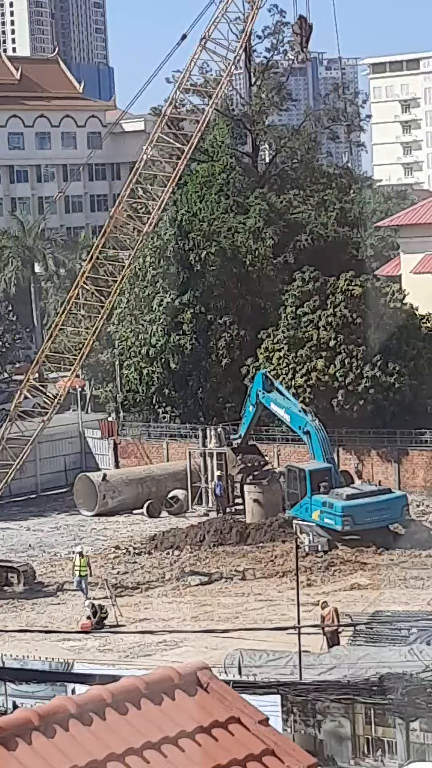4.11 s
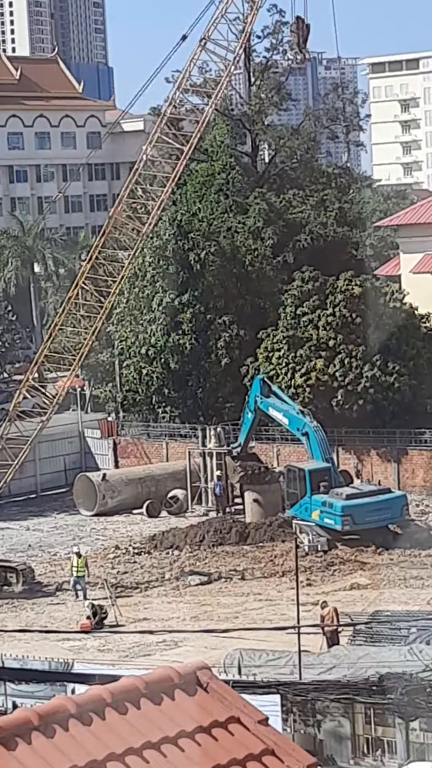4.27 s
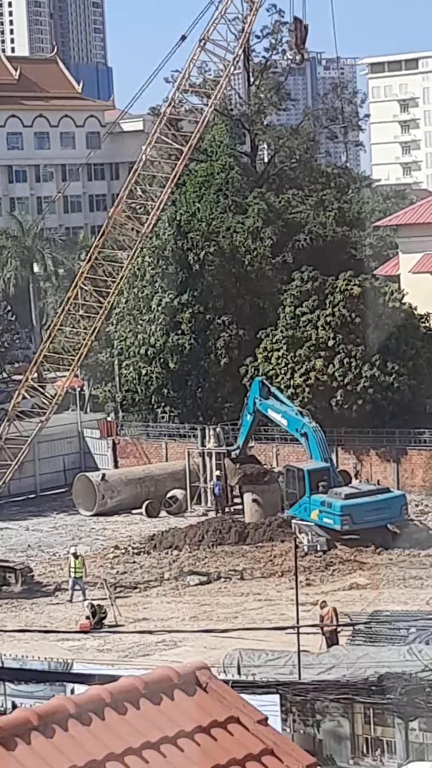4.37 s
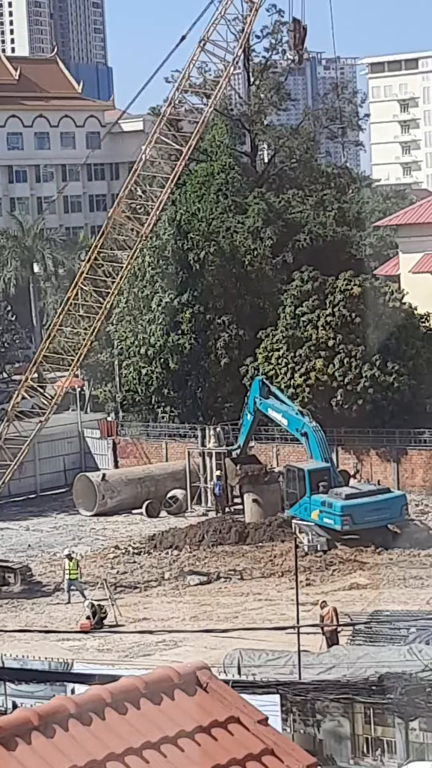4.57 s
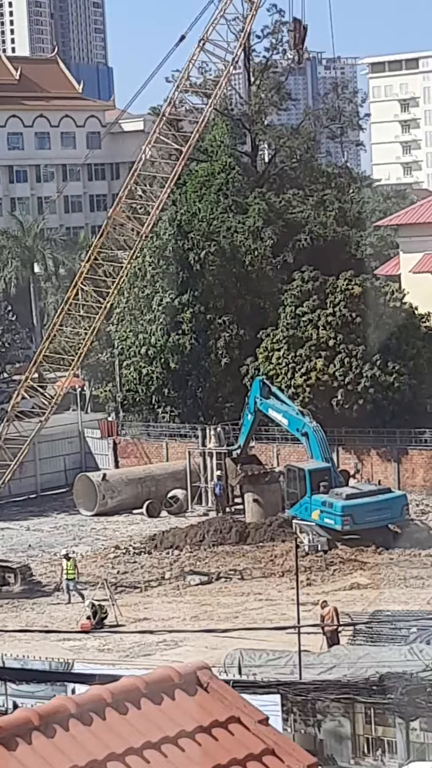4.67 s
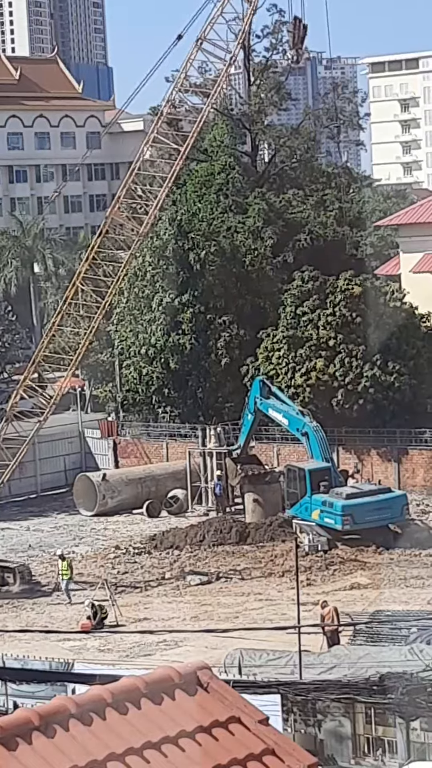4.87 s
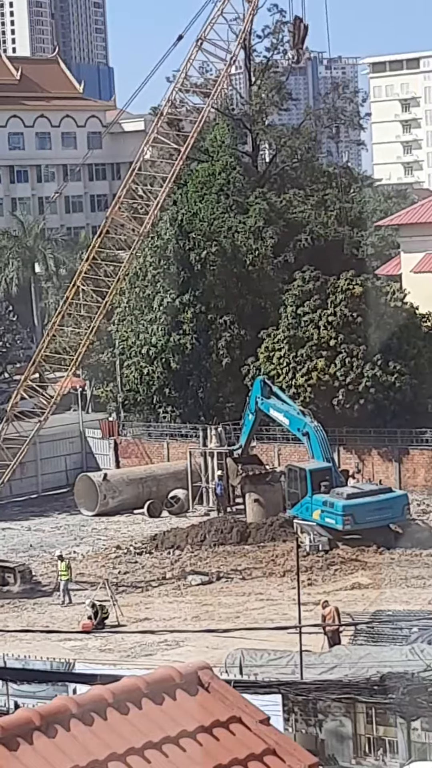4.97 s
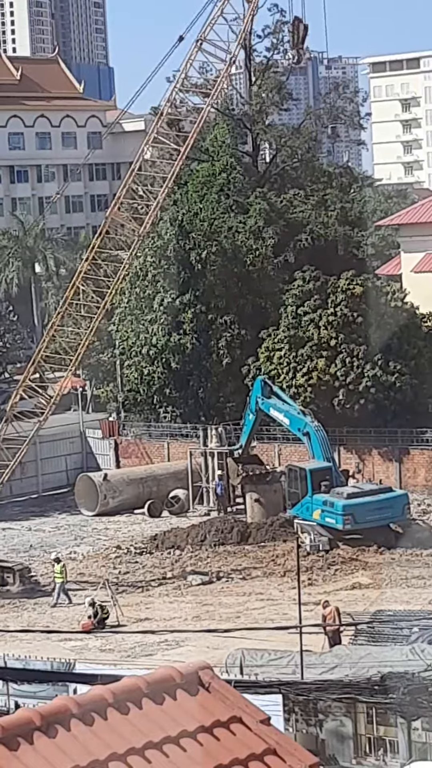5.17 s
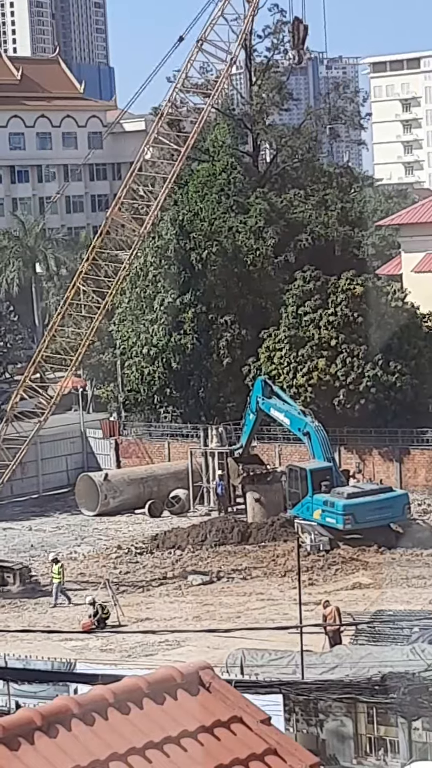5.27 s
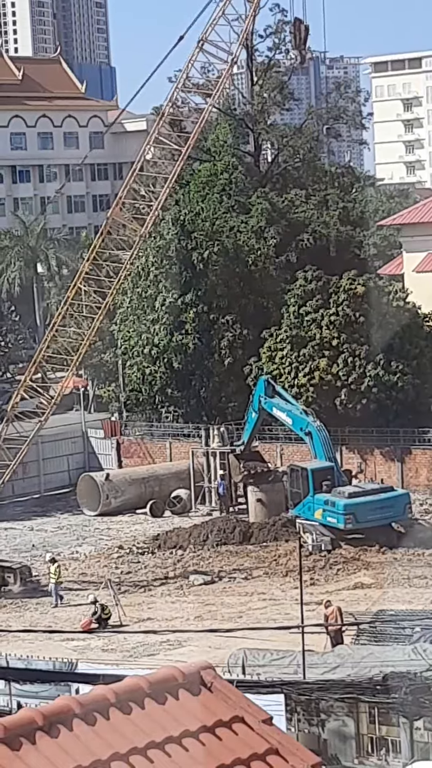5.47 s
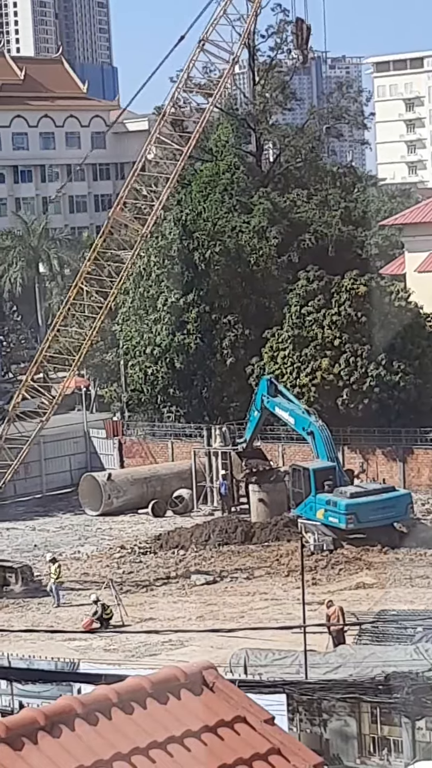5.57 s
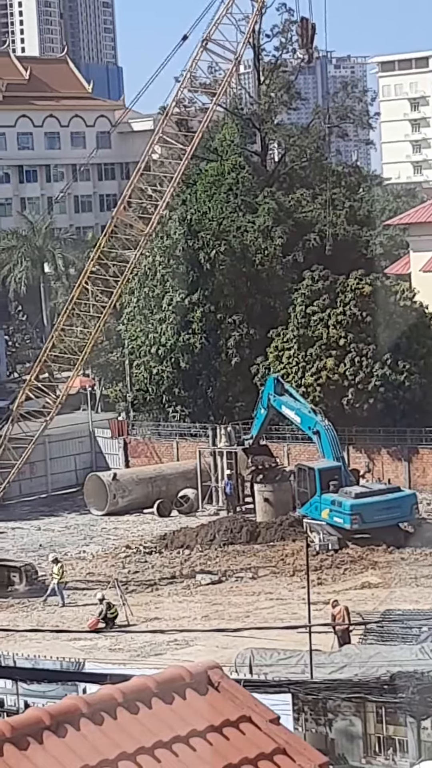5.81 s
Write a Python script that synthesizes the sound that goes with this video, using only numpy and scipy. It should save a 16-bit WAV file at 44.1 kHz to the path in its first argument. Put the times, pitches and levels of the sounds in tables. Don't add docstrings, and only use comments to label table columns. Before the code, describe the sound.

An open city construction site is heard from a high window, at a distance. A previous crash is dying away at the start, over a low diesel hum near 85 Hz that swells and dips irregularly, with far traffic droning and hissing. A tiny, very high brake squeak flickers around 0.8-1.1 s. At about 1.2 s an excavator bucket hits a hollow steel casing: a double knock, deep boom, midrange clang and small clinks, with a crash rolling back from building fronts. Close grainy finger rubs brush the left microphone from 1.05 to 1.85 s; small ticks follow at 2.3 and 2.5 s. The second blow, at 2.95 s, has the deepest boom, and rattles near 3.35 s. Hydraulic whine strengthens faintly after 3.7 s. The third blow lands at 4.6 s with sharper tooth clinks and rattles near 4.9 s, then decays into engine hum, passing tyres and soft road thumps until about 5.8 s.

```python
import sys
import numpy as np
from scipy import signal
from scipy.fft import rfft, irfft
from scipy.io import wavfile

SR = 44100
rng = np.random.default_rng(int(sys.argv[2]) if len(sys.argv) > 2 else 0)


def invert_db(x):
    u = np.asarray(x, float) / 20
    return 10 ** u


def dump_mix(stems):
    frames = np.atleast_2d(stems).T
    limited = np.clip(frames, -1, 1)
    pcm = np.round(limited * 32767).astype(np.int16)
    wavfile.write(sys.argv[1], SR, pcm)


N = 257544

# t/s, level/dB, boom level/dB, brightness/(dB per octave)
BLOWS = [
    (-.52, -18.5, -38, 3),
    (1.177, -23, -20.5, 2.5),
    (2.943, -22, -15.5, 3),
    (4.573, -22, -20.5, 2.5),
]
# t after the blow/s, level/dB
CONTACTS = [
    (-.004, -1),
    (0.01, 0.5),
    (.032, -7.5),
]
RUN_UP_S = 0.03
# f/Hz, level/dB, time to fall 60 dB/s
BOOM_MODES = [(57, -16.5, 2.0), (111.5, -1, .75), (123.8, 0, .75), (136, -7, .5), (149, -9, .5),
              (192, -8, 1.0)]
WALL_HZ = [263, 278, 313, 331, 365, 418, 475, 570, 622, 675, 706, 760, 930, 1197, 1250, 1335, 1406, 1637,
           1790, 1945, 2290, 2640, 3250, 3600]
# level/dB, time to fall 60 dB/s
WALL_RINGING = [(-9, 0.45), (-13, 0.24), (-5.5, 0.6), (-4.5, 0.33), (-10.5, 0.54), (-7, 0.28), (-10, 0.28),
                (-12, 0.34), (-18, 0.88), (-12, 0.23), (-17, 0.89), (-4, 0.072), (-16, 0.39), (-14, .3),
                (-24, 0.12), (-41, 0.15), (-22.5, 0.56), (-11, 0.3), (-23, .12), (-19, 0.13), (-30, 0.08),
                (-27, .08), (-29, .08), (-29, .1)]
# t/s, f/Hz, level/dB, time to fall 60 dB/s
TEETH = [(1.177, 4200, -42, .04), (1.196, 3200, -36, .09), (1.203, 3560, -37, .08), (1.2, 2300, -35, .06),
         (1.205, 4500, -41, .04), (1.205, 6900, -47, .03), (3.0, 3260, -39, .09), (4.6, 3260, -37, .06),
         (4.601, 3643, -28, .09), (4.61, 4550, -42, .05), (4.65, 3620, -39, .1), (4.768, 3640, -37, .07)]
# t after the blow/s, level/dB
FACADES = [
    (.004, -1),
    (0.032, 1.5),
    (0.092, -6),
    (0.138, -4),
    (0.262, -6),
    (.36, -9.5),
    (.46, -13),
    (.55, -16.5),
]
# f/Hz, level/(dB per Hz)
ROLL_COLOUR = [(25, -36), (45, -20), (110, 2), (200, -5), (320, 0.5), (700, -11), (1300, -18.5),
               (2500, -27.5), (3700, -34.5), (4500, -42), (7500, -44.5), (10000, -61), (15500, -96)]
# f/Hz, loss/(dB per s)
EXTRA_LOSS = [(60, -24), (300, 0.5), (1000, 0.3), (4000, 12.5), (12000, 61)]
# t/s, level above the roll/dB, length/s
REBOUNDS = [
    (1.214, 1.5, 0.01),
    (1.48, 3.5, .03),
    (3.358, 5.5, .035),
    (4.874, 2.5, 0.027),
    (4.955, 1.5, .03),
]
# multiple of firing/1, level/dB
DIESEL_ORDERS = [(0.667, -10.5), (1.999, -12.5), (3.001, -16), (3.999, -6), (6, -13.5)]
# t out of step/s, level of the next swell/dB
BEATS = [(-.02, -39), (.38, -39.5), (1.04, -33), (1.36, -40.5), (1.74, -41.5), (2.07, -36), (2.62, -34),
         (3.02, -37.5), (3.39, -37.5), (3.71, -37), (4.16, -36), (4.59, -33.5), (4.78, -42), (5.11, -37.5),
         (5.56, -43), (5.9, -44)]
# t/s, f/Hz, level/dB
PUMP = [
    (0, 3230, -74),
    (3.55, 3250, -73),
    (3.75, 3250, -67.5),
    (4.4, 3280, -68),
    (5.15, 3350, -68),
    (5.65, 3220, -65),
    (5.84, 3215, -65),
]
# t/s, length/s, f/Hz, slide/Hz, level/dB
VALVE = [
    (.22, .26, 3535, -80, -67),
    (1.2, .17, 3560, 10, -55),
    (1.88, .27, 3540, 60, -70),
    (2.17, .35, 3490, 60, -66),
    (3.55, .27, 3580, -90, -69),
    (3.82, .24, 3490, 70, -69),
    (5.55, .28, 3480, -10, -71),
]
# t/s, length/s, f/Hz, slide/Hz, level/dB
SQUEAK = [
    (.79, .08, 9045, -10, -62),
    (.878, .03, 8980, -80, -64),
    (.91, .05, 9125, 5, -61.5),
    (.935, .08, 8900, 100, -67),
    (1.015, .03, 8900, 30, -66),
    (1.045, .05, 9050, -200, -64),
    (2.15, .05, 9010, 0, -71),
    (2.215, .06, 9000, 0, -69),
    (2.37, .06, 9000, 0, -78),
]
# t of firmest touch/s, level/dB, half length/s
STROKES = [
    (1.072, -60, 0.012),
    (1.134, -54.5, 0.02),
    (1.267, -60, .018),
    (1.31, -64, .026),
    (1.466, -47.5, 0.034),
    (1.598, -49.5, 0.013),
    (1.681, -48.5, 0.031),
    (1.743, -53.5, 0.044),
    (1.818, -50, 0.028),
]
# f/Hz, level/(dB per Hz)
RUB_COLOUR = [(700, -16), (1500, 5), (3000, 2), (6000, -6.5), (10000, -2.2), (13000, 1), (15500, -12)]
# t/s, peak level/dB
TICKS = [
    (2.323, -42.5),
    (2.4848, -51),
]
# t/s, level/dB
THUMPS = [
    (1.62, -28),
    (2.05, -38),
    (4.68, -35),
    (5.77, -43),
    (5.81, -32.5),
]
# f/Hz, level/dB
DRONE_COLOUR = [(25, -38), (45, -31), (62, -48), (90, -17.5), (140, -20), (221, -31), (340, -24),
                (582, -34.5), (1000, -39), (2000, -41.5), (3300, -51), (4200, -57.5), (9000, -67.5),
                (15500, -92)]
# t/s, level/dB
BUSTLE = [(0, 2), (.35, 1.5), (.7, -2.5), (1.0, 2), (1.9, 2.5), (2.5, -3), (2.85, 1), (3.65, -1),
          (4.05, -3), (4.4, 0), (5.2, 3.5), (5.65, -3.5), (5.84, 0)]
# t/s, level above the drone/dB, length/s
HISS_SURGES = [
    (0.718, 4.5, 0.19),
    (2.225, 4.5, 0.33),
    (5.4, 3, 0.23),
]
# f/Hz, likeness/1
LIKENESS = [(60, 0.97), (140, .95), (210, 0.94), (330, .93), (500, 0.66), (770, 0.35), (1200, 0.79),
            (1790, 0.2), (2740, .9), (4190, 0.12), (6400, .02), (15000, .01)]
# f/Hz, left minus right/dB
LEANING = [(60, -4), (130, 2), (290, 1), (640, 3.5), (1410, 2.5), (3100, -0.5), (6820, -0.5), (15000, 22)]
# f/Hz, width/Hz, lift/dB
WINDOW_BAY = [(316.6, 112, 4), (435, 86, -3.5), (838, 124, -3), (1109, 69, -15), (1246, 141, 8),
              (1230, 510, 2.5), (1737, 43, -7.5), (2280, 40, 5), (2510, 99, 3.5), (5660, 580, -5.5),
              (6200, 2000, 5)]
EDGES = 22 * 2 ** np.arange(0, 9.6, 1 / 3)


def boom(swell_s=0.031, crest_s=0.0233):
    (_, _, boom_db, _), age = since_blow()
    swell = 1 - np.exp(-((age + RUN_UP_S) / (2 * swell_s)) ** 2)
    tone = 0
    for hz, db, t60 in BOOM_MODES:
        tone = tone + invert_db(db - 60 * age / t60) * np.cos(2 * np.pi * hz * (age - crest_s))
    return placed(invert_db(boom_db + 3.5) * swell * tone, 0, hz=121)


def clang(level_db=-20, contact_db=3, knocks_per_s=900, soft_hz=5000):
    (_, blow_db, _, _), age = since_blow()
    echo_shape = invert_db(blow_db + level_db + echo_db(age))
    heard = BLOWS[1:]
    at = np.array([round((s + late) * SR) for s, *_ in heard for late, _ in CONTACTS])
    force = invert_db([db + touch_db + contact_db for _, db, *_ in heard for _, touch_db in CONTACTS])
    chance = rng.standard_normal((2, N)) * (rng.random((2, N)) < knocks_per_s / SR)
    out = 0
    for hz, (db, t60) in zip(WALL_HZ, WALL_RINGING):
        knocks = echo_shape * np.roll(chance, rng.integers(N), axis=1)
        uneven = invert_db(rng.normal(0, 1.5, (2, len(at))))
        knocks[:, at] += force * uneven * rng.choice([-1, 1], (2, len(at)))
        r, w = invert_db(-60 / (t60 * SR)), 2 * np.pi * hz / SR
        ring = signal.lfilter([0, np.sin(w)], [1, -2 * r * np.cos(w), r * r], knocks + 1e-18)
        mid, side = ring
        out = out + invert_db(db) * placed(mid, side, hz)
    give = signal.butter(2, soft_hz, fs=SR, output="sos")
    return signal.sosfilt(give, out)


def teeth(rise_s=0.0009):
    age, out = np.arange(SR // 4) / SR, np.zeros((2, N))
    for s, hz, db, t60 in TEETH:
        envelope = invert_db(db - 60 * age / t60) * (1 - np.exp(-age / rise_s))
        ring = envelope * np.sin(2 * np.pi * hz * age)
        out[:, round(s * SR):][:, :len(age)] += placed(ring, .5 * ring, hz)
    return out


def echo_db(age, rise_db_per_s=1907, smear_s=0.021, dying_db_per_s=86):
    power = 1e-7
    for late, db in FACADES:
        rising = (age - late) * rise_db_per_s / (1 + late / smear_s)
        dying = (late - age) * dying_db_per_s
        power = power + invert_db(2 * (db + np.minimum(rising, dying)))
    return 10 * np.log10(power)


def roll(level_db=19.0, patchy_db=-0.04, lead_s=0.015, rattle_hz=2300, rattle_octaves=1.4):
    (_, blow_db, _, bright_db), age = since_blow()
    together, ages = drift(23), np.arange(-.05, 2, .001)
    returns_db = echo_db(ages)
    rattle_db = bumps(REBOUNDS)

    def gain(hz):
        back_db = np.interp(age + lead_s * min(1, 300 / hz), ages, returns_db)
        colour_db = at_hz(ROLL_COLOUR, hz) + bright_db * np.log2(hz / 500)
        colour_db = colour_db - at_hz(EXTRA_LOSS, hz) * age
        colour_db = colour_db + rattle_db * np.exp(-(np.log2(hz / rattle_hz) / rattle_octaves) ** 2)
        chance_db = patchy_db * (together + drift(18.0)) + 1.53 * drift(45)
        return invert_db(level_db + blow_db + back_db + colour_db + chance_db)
    return gain


def diesel(firing_hz=84.87, waver_db=0.5, jitter=0.15):
    level_db = beating()
    turn = 2 * np.pi * firing_hz * np.arange(N) / SR + jitter * drift(4.1)
    out = placed(np.sqrt(2) * invert_db(level_db) * np.sin(turn), 0, firing_hz)
    for k, db in DIESEL_ORDERS:
        strength = invert_db(np.mean(level_db) - 1.5 + db + waver_db * drift(2.9))
        order = strength * np.sin(k * turn)
        out = out + placed(np.sqrt(2) * order, 0.35 * order, firing_hz * k)
    return out


def beating(share=0.51):
    s, db = np.transpose(BEATS)
    t = np.arange(N) / SR
    slip = 2 * np.pi * np.interp(t, s, np.arange(len(s)))
    pair = np.abs(1 - share * np.exp(1j * slip)) / (1 + share)
    swell_db = np.interp(t, (s[1:] + s[:-1]) / 2, db[:-1])
    return swell_db + 20 * np.log10(pair)


def pump():
    return whine([PUMP], blur_hz=25.0, flutter_db=3.5, lean_db=1.5)


def valves():
    return whine(glides(VALVE, edge_db=4), blur_hz=12.0, flutter_db=3.0, lean_db=1.5)


def brake():
    return whine(glides(SQUEAK, edge_db=3), blur_hz=35.0, flutter_db=3.0, lean_db=.1)


def whine(tables, blur_hz, flutter_db, lean_db):
    out = np.zeros((2, N))
    for rows in tables:
        hz, level_db = in_time(rows)
        for side in (0, 1):
            turn = 2 * np.pi * np.cumsum(hz + blur_hz * drift(66.3)) / SR
            gain = invert_db(level_db + 4.5 + flutter_db * drift(50) + lean_db * (2.5 - side))
            out[side] += gated(rows) * gain * np.sin(turn)
    return out


def glides(rows, edge_db):
    out = []
    for s, length, hz, slide, db in rows:
        start = (s, hz, db - edge_db)
        middle = (s + length / 2, hz + slide / 2, db)
        end = (s + length, hz + slide, db - edge_db)
        out.append([start, middle, end])
    return out


def gated(rows, fade_s=0.011):
    t = np.arange(N) / SR
    inside_s = np.minimum(t - rows[0][0], rows[-1][0] - t)
    return np.clip(inside_s / fade_s + 1, 0, 1)


def finger(level_db=26, grain_db=1.0, fall_db=11.5, roundness=1.43):
    hz = np.fft.rfftfreq(N, 1 / SR) + 1
    grains = rng.standard_normal(N) * invert_db(grain_db * drift(200))
    hiss = irfft(rfft(grains) * invert_db(at_hz(RUB_COLOUR, hz)), N)
    t = np.arange(N) / SR
    strokes = sum(invert_db(db - fall_db * np.abs((t - s) / half) ** roundness) for s, db, half in STROKES)
    return invert_db(level_db - 13.0) * strokes * hiss * [[1], [.03]]


def ticks(decay_s=0.0036):
    t = np.arange(N) / SR
    shape = sum(invert_db(db) * (t >= s) * np.exp(-np.abs(t - s) / decay_s) for s, db in TICKS)
    bright = signal.butter(2, [4000, 11500], "band", fs=SR, output="sos")
    return signal.sosfilt(bright, shape * rng.standard_normal((2, N)))


def thumps(low_hz=90, high_hz=190, length_s=0.027):
    t = np.arange(N) / SR
    shape = sum(invert_db(db) * np.exp(-((t - s) / length_s) ** 2) for s, db in THUMPS)
    band = signal.butter(2, [low_hz, high_hz], "band", fs=SR, output="sos")
    rumble = rms_one(signal.sosfilt(band, rng.standard_normal(N)))
    return placed(shape * rumble, 0, high_hz)


def drone(level_db=3, patchy_db=1.74):
    (bustle_db,), together = in_time(BUSTLE), drift(0.72)
    rumble_db, roar_db = 0.81 * bustle_db, 0.59 * bustle_db
    hiss_db = .3 * bustle_db + bumps(HISS_SURGES)

    def gain(hz):
        swell_db = rumble_db if hz <= 450 else roar_db if hz <= 3500 else hiss_db
        swell_db = swell_db - np.mean(swell_db) + patchy_db * (.5 * together + drift(16))
        return invert_db(level_db + at_hz(DRONE_COLOUR, hz) + swell_db)
    return gain


def site_noise():
    steady, crash = drone(), roll()
    return sum(np.hypot(steady(hz), crash(hz)) * noise for hz, noise in bands())


def bands():
    white = rng.standard_normal((2, 2, N + SR))
    for k, (low, high) in enumerate(zip(EDGES, EDGES[1:])):
        centre = np.sqrt(low * high)
        band = signal.butter(2, [low, high], "band", fs=SR, output="sos")
        mid, side = signal.sosfilt(band, white[k % 2])[:, SR:]
        yield centre, placed(mid, side, centre)


def placed(mid, side, hz):
    alike = np.clip(at_hz(LIKENESS, hz), 0, 1)
    shared, apart = np.sqrt((1 + alike) / 2) * mid, np.sqrt((1 - alike) / 2) * side
    pair = shared + apart * np.array([[1], [-1]])
    return pair * invert_db(at_hz(LEANING, hz) * np.array([[.5], [-.5]]))


def since_blow():
    rows, t = np.array(BLOWS), np.arange(N) / SR
    last = np.searchsorted(rows[:, 0] - RUN_UP_S, t) - 1
    return rows[last].T, t - rows[last, 0]


def bumps(rows):
    t = np.arange(N) / SR
    return sum(db * np.exp(-((t - s) / length) ** 2) for s, db, length in rows)


def drift(rate):
    r = np.exp(-80 * np.pi * rate / SR)
    slow = signal.lfilter([1], [1, -2 * r, r * r], rng.standard_normal(N // 40 + 2002))[2000:]
    return np.interp(np.arange(N) / 40, np.arange(len(slow)), rms_one(slow))


def in_time(rows):
    s, *columns = np.transpose(rows)
    return [np.interp(np.arange(N) / SR, s, c) for c in columns]


def at_hz(points, hz):
    f, value = np.transpose(points)
    return np.interp(np.log(hz), np.log(f), value)


def rms_one(x):
    return x / np.sqrt(np.mean(x ** 2) + 1e-20)


def scene():
    blows = boom() + clang() + teeth()
    machines = diesel() + pump() + valves() + brake()
    site = blows + site_noise() + machines + thumps()
    site[1] = np.roll(site[1], 2)
    return site + finger() + ticks()


def low_pass(x):
    return signal.sosfilt(signal.butter(12, 15710, fs=SR, output="sos"), x)


def record(dry):
    x = dry
    for hz, width_hz, lift_db in WINDOW_BAY:
        r, w = np.exp(-np.pi * width_hz / SR), 2 * np.pi * hz / SR
        top = [(1 - r * r) / 2, 0, (r * r - 1) / 2]
        band = signal.lfilter(top, [1, -2 * r * np.cos(w), r * r], x)
        x = x + (invert_db(lift_db) - 1) * band
    return low_pass(x)


dry = scene()
out = record(dry)
dump_mix(out)
```